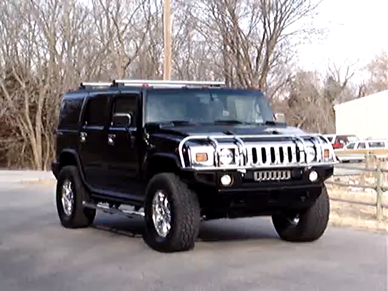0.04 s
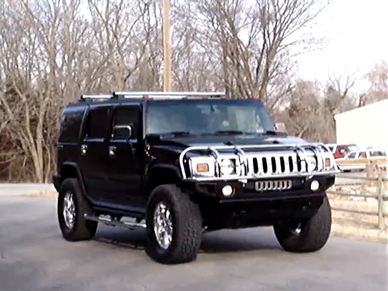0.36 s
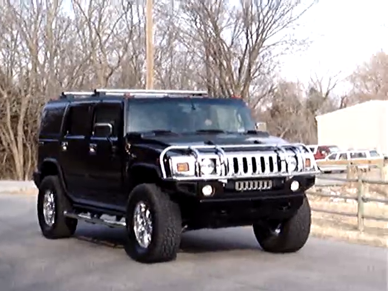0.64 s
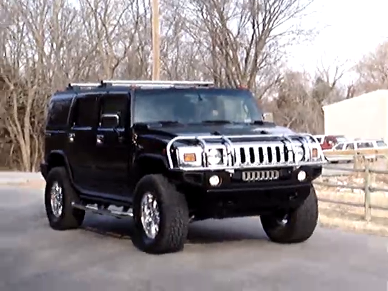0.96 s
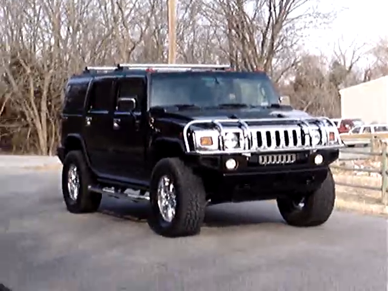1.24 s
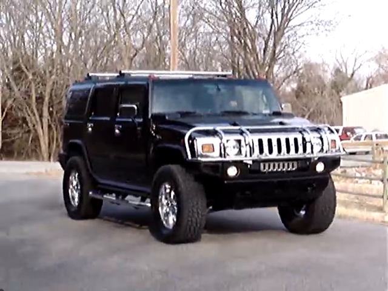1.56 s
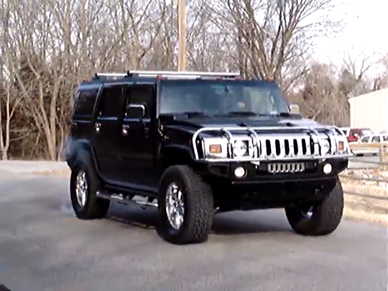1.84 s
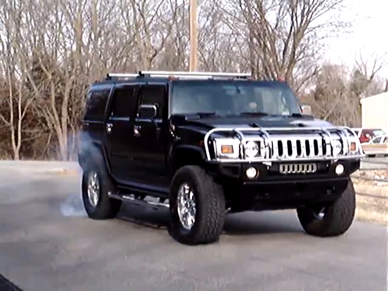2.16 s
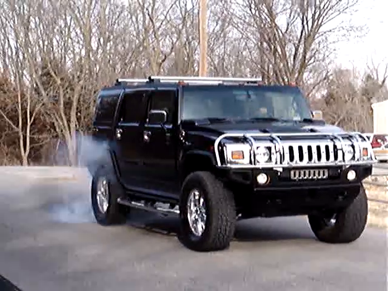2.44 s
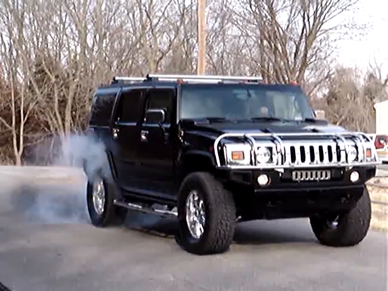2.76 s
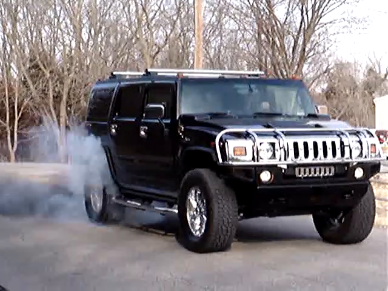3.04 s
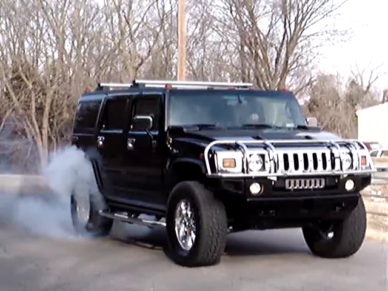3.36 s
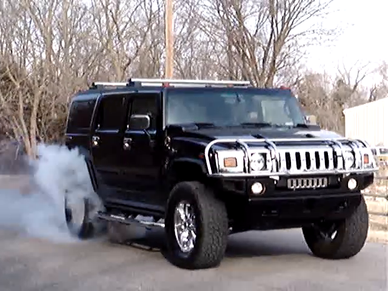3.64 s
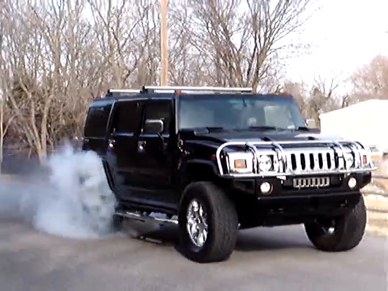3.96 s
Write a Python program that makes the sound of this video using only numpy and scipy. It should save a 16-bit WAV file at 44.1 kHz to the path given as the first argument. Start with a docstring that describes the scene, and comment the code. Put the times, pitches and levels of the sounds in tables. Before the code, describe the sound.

A big truck does a burnout, rear tyre spinning loudly on pavement over a climbing engine.

```python
"""A heavy V8 truck does a standing burnout on an open paved lot, some metres away.
The engine climbs through its exhaust boom while fan and intake rush. In the first 0.6 s stones snap and
the axle shudders as the rear tyre breaks loose. From 1 s the tread scrubs loudly in stick-slip, tearing
up grit; tread and axle whine upward with the wheel. Near 2.9 s the rubber smokes and the scrub brightens.
After 3 s the revs dip and recover, amid short squeals."""
import sys
import numpy as np
from scipy import signal
from scipy.fft import rfft, irfft
from scipy.io import wavfile

SR = 44100
rng = np.random.default_rng(int(sys.argv[2]) if len(sys.argv) > 2 else 0)


def generate_wav(signal):
    """Clip the signal to [-1, 1] and save it as 16-bit WAV at the path in sys.argv[1]."""
    frames = np.transpose(np.atleast_2d(signal))
    scaled = np.clip(frames, -1, 1) * 32767
    pcm = np.round(scaled).astype(np.int16)
    wavfile.write(sys.argv[1], SR, pcm)


N = 176400


def undb(db):
    """Decibels to gain."""
    return 10 ** (np.asarray(db) / 20)


def seconds():
    """Time of each sample."""
    return np.arange(N) / SR


def curve(rows):
    """Straight lines through (s, value) points."""
    return np.interp(seconds(), *np.array(rows, float).T)


def unit(x):
    """Scale to standard deviation 1."""
    return x / np.std(x)


def colour(x, points):
    """Minimum-phase filter through (Hz, dB) points, unit power gain."""
    size = 4096
    hz, db = np.array(points, float).T
    gain = undb(np.interp(np.log(np.fft.rfftfreq(size, 1 / SR) + 1), np.log(hz), db))
    cepstrum = irfft(np.log(gain))
    cepstrum[1:size // 2] *= 2
    cepstrum[size // 2 + 1:] = 0
    impulse = irfft(np.exp(rfft(cepstrum)))
    return signal.fftconvolve(x, impulse / np.linalg.norm(impulse))[:N]


def noise():
    """White noise."""
    return rng.standard_normal(N)


def walk(rate_hz):
    """Smooth random drift up to about rate_hz, spread 1."""
    lowpass = np.exp(-.5 * (np.fft.rfftfreq(N, 1 / SR) / rate_hz) ** 2)
    return unit(irfft(rfft(noise()) * lowpass, N))


def angle(hz):
    """Phase of a moving frequency."""
    return 2 * np.pi * np.cumsum(hz) / SR


def narrow(hz, width_hz):
    """Narrow noise band: an unsteady tone."""
    phase = angle(hz)
    return walk(width_hz) * np.cos(phase) + walk(width_hz) * np.sin(phase)


def swell(peak_s, sigma_s):
    """Gaussian rise and fall."""
    return np.exp(-.5 * ((seconds() - peak_s) / sigma_s) ** 2)


def shudder():
    """Short low judder of the axle as the tyre takes the load."""
    # Peak time in seconds, sigma in seconds, pitch in Hz, level in dB.
    judder = (.38, .05, 68, -39)
    peak_s, sigma_s, hz, db = judder
    return undb(db) * swell(peak_s, sigma_s) * narrow(np.full(N, hz), hz / 8)


def stones(decay_s=0.0023):
    """Stones crack under the tyre as it breaks loose."""
    # Each row: start in seconds, level in dB.
    snaps = [(0.15, -20.5), (0.173, -28), (.195, -16), (0.2087, -11), (.242, -21), (0.252, -6),
             (0.488, -8.5), (.493, -17), (0.497, -4), (0.564, -8.5), (0.581, -10)]
    # Crack spectrum. Each row: frequency in Hz, relative gain in dB.
    snap_colour = [(200, -10), (900, 0), (1600, -6), (2000, 5.5), (2350, 6.5), (3000, -11.5), (3800, -2.5),
                   (5200, -15.5), (7500, -12.5), (10000, -20)]
    t = seconds()
    bursts = sum(undb(db) * (t >= start_s) * np.exp(-np.abs(t - start_s) / decay_s) for start_s, db in snaps)
    return colour(np.sign(noise()) * bursts, snap_colour)


def intake(firing_hz, pulsing=0.13):
    """Fan and intake air pulses with the cylinders and whistles as the throttle opens."""
    # Air rush. Each row: time in seconds, level in dB.
    rush_db = [(0, -30), (.17, -30), (.3, -25), (.5, -22), (.8, -19), (1.3, -24), (2.6, -32), (4, -22.5)]
    # Its spectrum. Each row: frequency in Hz, relative gain in dB.
    rush_colour = [(150, -18.5), (400, 3), (680, 7.5), (950, -6), (1280, 7), (1580, 10.5), (1850, 0.5),
                   (2400, 8.5), (3000, 3.5), (3700, -10), (5000, -8), (6200, -23.5), (7500, -15.5),
                   (10000, -63)]
    # Each row: ratio to the firing rate, peak time in seconds, sigma in seconds, level in dB.
    whistles = [(98, .57, .14, -42), (30, .32, .08, -30), (47, .58, .13, -37)]
    air = colour(noise() * (1 + pulsing * np.cos(angle(firing_hz))), rush_colour)
    whistling = sum(undb(db) * swell(peak_s, sigma_s) * narrow(ratio * firing_hz, width_hz=280)
                    for ratio, peak_s, sigma_s, db in whistles)
    return air * undb(curve(rush_db)) + whistling


def exhaust(firing_hz, boom_hz=219.7, boom_width_hz=38, boom_skirt=0.12, waver=0.11, puff=0.39):
    """Uneven V8 firings give lines that bloom in the pipe's boom; gas rumbles in puffs."""
    # Relative level in dB of orders 6 to 20 of the eight-cylinder cycle, ahead of the boom.
    order_db = [-12.5, -20, 0.5, -12, -1, -15.5, -11.5, -5, -7, -7, 6.5, -14.5, -8, -18.5, -15]
    # Exhaust tone and gas turbulence. Each row: time in seconds, gain in dB.
    tone_db = [(0, -45), (.35, -33.5), (.65, -32.5), (.95, -26.5), (1.25, -34), (1.7, -39), (2.1, -41.5),
               (2.5, -33.5), (2.9, -32.5), (3.15, -31), (3.6, -28), (4, -29)]
    rumble_db = [(0, -39), (.2, -33.5), (.35, -28), (.65, -23.5), (.9, -30), (1.15, -37), (1.5, -44),
                 (2.1, -41), (2.7, -37.5), (3.15, -33.5), (3.5, -40), (4, -37)]
    # Turbulence spectrum. Each row: frequency in Hz, relative gain in dB.
    rumble_colour = [(25, -7), (50, -22), (70, -13), (120, -6), (200, 4), (270, 3), (400, -3.5),
                     (600, -4.5), (1200, -24)]
    cycle_hz = firing_hz / 8
    phase = angle(cycle_hz * (1 + 0.0038 * walk(13.5)))
    tone = 0
    for order, db in enumerate(order_db, start=6):
        boom = boom_skirt + 1 / np.hypot(1, 2 * (order * cycle_hz - boom_hz) / boom_width_hz)
        gain = undb(db) * boom * (1 + waver * walk(11))
        tone += gain * np.sin(order * phase + 2 * np.pi * rng.random())
    gas = colour(noise() * (1 + puff * np.cos(angle(firing_hz))), rumble_colour)
    return tone * undb(curve(tone_db)) + gas * undb(curve(rumble_db))


def whine(whine_hz, waver=.5):
    """Rough tones of tread and axle rise with the spinning wheel."""
    # Tread and axle whines, high axle whirrs.
    # Each row: ratio to the main whine, peak time in seconds, sigma in seconds, level in dB.
    whines = [(1, 2.15, .38, -21.5), (1.135, 2.74, .26, -18.5), (1.135, 3.8, .22, -29), (1.68, 2, .28, -24),
              (2.18, 1.4, .2, -24), (2.6, 1.35, .17, -22.5), (1, 3.42, .13, -25), (.89, 2.6, .25, -26),
              (1.43, 1.7, .4, -29)]
    whirrs = [(14.3, .78, .13, -38), (14.3, 1.38, .15, -50)]
    whining = 0
    for ratio, peak_s, sigma_s, db in whines:
        tone = np.sin(angle(ratio * whine_hz * (1 + .006 * walk(50))))
        whining += undb(db) * swell(peak_s, sigma_s) * unit((1 + waver * walk(37)) * tone)
    whirring = sum(undb(db) * swell(peak_s, sigma_s) * narrow(ratio * whine_hz, width_hz=190)
                   for ratio, peak_s, sigma_s, db in whirrs)
    return whining + whirring


def slips(bed, grains_per_s=2500, spread_db=0.5):
    """Tiny slips: random clicks over a bed of white noise."""
    sizes = undb(spread_db * np.minimum(rng.exponential(size=N), 4.5))
    grains = (rng.random(N) < grains_per_s / SR) * sizes * np.sign(noise())
    return unit(unit(grains) + bed * noise())


def chirps(per_s=150, mean_sigma_s=.014, low_hz=520, high_hz=2400):
    """Short random tones where rubber briefly grips in step."""
    t = np.arange(SR // 8) / SR
    out = np.zeros(N + SR)
    for when, pitch, length, phase in rng.random((int(per_s * N / SR), 4)):
        hz = low_hz + pitch * (high_hz - low_hz)
        start = int(when * N)
        envelope = np.exp(-.5 * ((t - t.mean()) / (mean_sigma_s * (.5 + length))) ** 2)
        out[start:start + len(t)] += envelope * np.sin(2 * np.pi * (hz * t + phase))
    return unit(out[:N])


def scrub(smoke_s=2.895, smoke_rise_s=0.043, chirp_gain=.62):
    """Slips and chirps ring the carcass; the spectrum brightens once the rubber smokes."""
    # Each row: time in seconds, level in dB.
    scrub_db = [(0, -33.5), (.44, -41), (.5, -22), (.8, -35), (1.05, -16.5), (1.35, -15), (1.8, -15.5),
                (2.4, -16.5), (2.7, -16), (3.05, -16), (3.4, -15), (3.6, -15), (4, -16.5)]
    # Cold and smoking rubber. Each row: frequency in Hz, relative gain in dB.
    cold_colour = [(200, -58.5), (430, -35.5), (590, -4), (750, -1.5), (950, -1), (1250, 0), (1550, -3.5),
                   (1800, -9), (2050, -3.5), (2600, -19), (4000, -42), (9000, -56.5)]
    hot_colour = [(200, -44.5), (430, -19.5), (620, -9), (790, -10), (990, -1), (1120, -4.5), (1300, -2),
                  (1540, -2.5), (1820, -8.5), (2020, -6), (2600, -12.5), (4000, -22.5), (9000, -45)]

    def rubber(points):
        return unit(colour(slips(bed=1.08), points) + chirp_gain * unit(colour(chirps(), points)))

    hot = .5 + .5 * np.tanh((seconds() - smoke_s) / smoke_rise_s)
    blend = np.sqrt(1 - hot) * rubber(cold_colour) + np.sqrt(hot) * rubber(hot_colour)
    return blend * undb(curve(scrub_db))


def squeal(jitter_hz=18.8):
    """Hot rubber squeals in short wavering tones."""
    # Each row: peak time in seconds, sigma in seconds, pitch in Hz, level in dB.
    squeals = [(1.25, .035, 1240, -19), (2.62, .07, 990, -24), (2.76, .1, 630, -26),
               (3.42, .035, 1990, -25), (3.57, .035, 1000, -17), (3.575, .025, 1110, -18.5),
               (3.6, .08, 610, -28), (3.64, .03, 1700, -23), (3.64, .04, 1985, -22),
               (3.7, .025, 1200, -18.5)]
    return sum(undb(db) * swell(peak_s, sigma_s) * unit(np.sin(angle(hz + jitter_hz * walk(59.2))))
               for peak_s, sigma_s, hz, db in squeals)


def tyre(whine_hz, turn_hz=7.4, turn_depth=0.036, block_depth=0.097, flutter_db=0.9):
    """Tread blocks stick and slip; the fluttering grip modulates scrub, squeal and grit from the road."""
    # Torn-up grit. Each row: time in seconds, level in dB.
    grit_db = [(0, -58), (.25, -33.5), (.47, -25), (.49, -21), (.53, -24.5), (.57, -23), (.65, -23.5),
               (.95, -21), (1.37, -25.5), (1.5, -27.5), (2.2, -25.5), (2.75, -27), (3.1, -21.5), (3.3, -29),
               (3.5, -27.5), (4, -19)]
    # Its spectrum. Each row: frequency in Hz, relative gain in dB.
    grit_colour = [(200, -35), (600, -1), (1400, -1.5), (2200, 0), (3100, 1.5), (4000, -7), (5000, -16),
                   (6200, -19.5), (7400, -16), (8600, -20.5), (9500, -25), (11000, -61.5)]
    turn = 1 + turn_depth * np.sin(2 * np.pi * turn_hz * seconds())
    block_hz = .14 * whine_hz * (1 + 0.041 * walk(40))
    grip = turn * (1 + block_depth * np.cos(angle(block_hz))) * undb(flutter_db * walk(25))
    rubber = scrub() + squeal()
    grit = colour(slips(bed=0.62), grit_colour) * undb(curve(grit_db))
    return np.abs(grip) ** 0.46 * rubber + grip * grit  # rubber follows the flutter only in part


def scene():
    """Engine, axle and tyre from one spot in the open, mono."""
    # Engine speed. Each row: time in seconds, firing rate in Hz.
    engine_speed = [(0, 66), (.3, 74), (.5, 93), (.8, 100), (1, 106), (1.3, 114), (1.65, 123), (2, 135),
                    (2.3, 149), (2.5, 164), (2.7, 182), (2.9, 207), (3.05, 222), (3.3, 219), (3.45, 210),
                    (3.6, 200), (3.8, 212), (4, 220)]
    # Wheel speed. Each row: time in seconds, pitch of the main whine in Hz.
    wheel_speed = [(0, 60), (.4, 160), (.7, 280), (1, 398), (1.45, 582), (1.7, 712), (2, 850), (2.33, 1020),
                   (2.67, 1195), (2.85, 1325), (2.95, 1410), (3.07, 1445), (3.25, 1380), (3.47, 1550),
                   (3.65, 1730), (4, 2000)]
    firing_hz, whine_hz = curve(engine_speed), curve(wheel_speed)
    engine = exhaust(firing_hz) + intake(firing_hz)
    return (engine + whine(whine_hz) + tyre(whine_hz) + shudder() + stones())[None]


def record(dry, start_s=0.043, ceiling=0.92, low_cut_hz=45, high_cut_hz=10000):
    """Fade in over 4 ms at start_s, round the peaks, cut deep bass and top."""
    fade_in = np.clip((seconds() - start_s) / .004, 0, 1)
    rounded = ceiling * np.tanh(dry * fade_in / ceiling)
    highpass = signal.butter(2, low_cut_hz, "high", fs=SR, output="sos")
    lowpass = signal.ellip(12, .2, 70, high_cut_hz, fs=SR, output="sos")
    return signal.sosfilt(lowpass, signal.sosfilt(highpass, rounded))


dry = scene()
out = record(dry)
generate_wav(out)
```